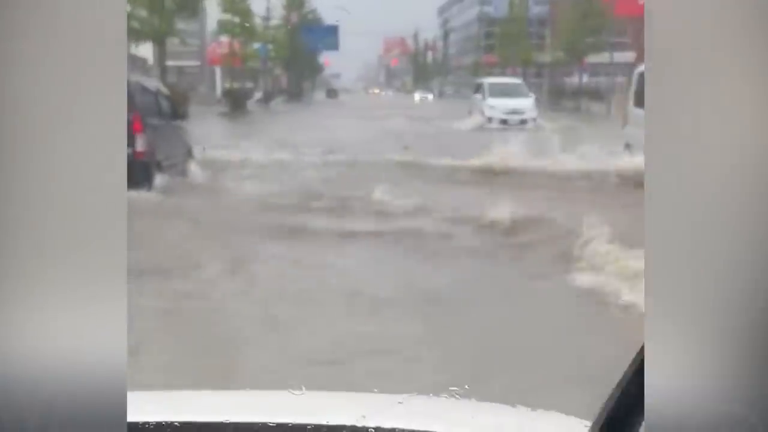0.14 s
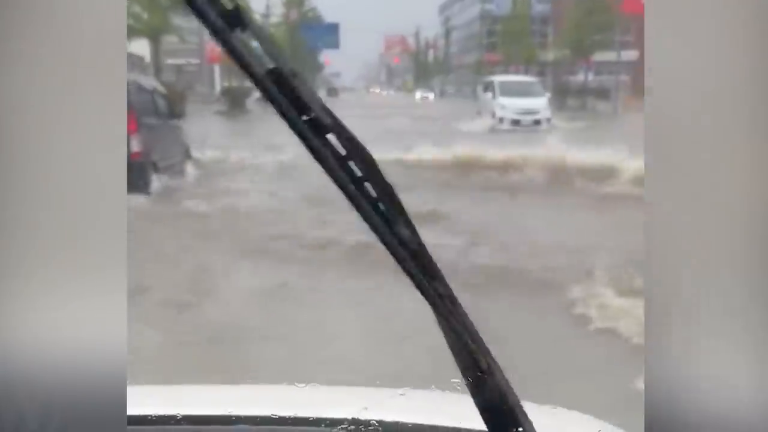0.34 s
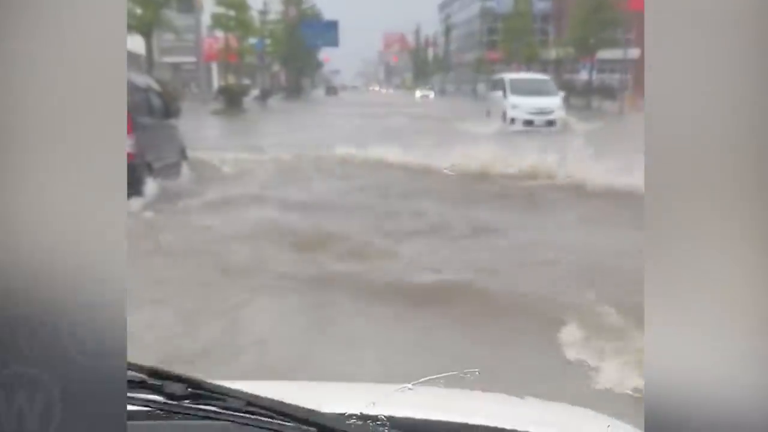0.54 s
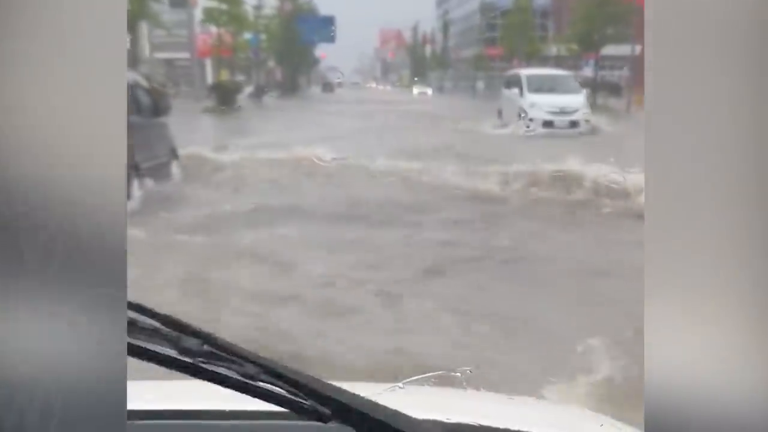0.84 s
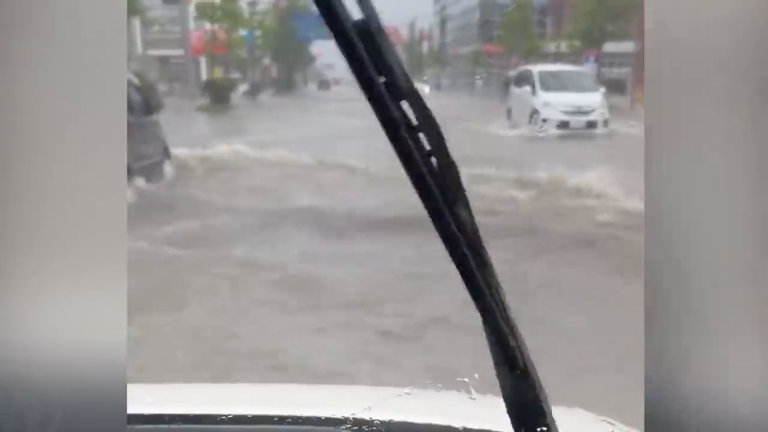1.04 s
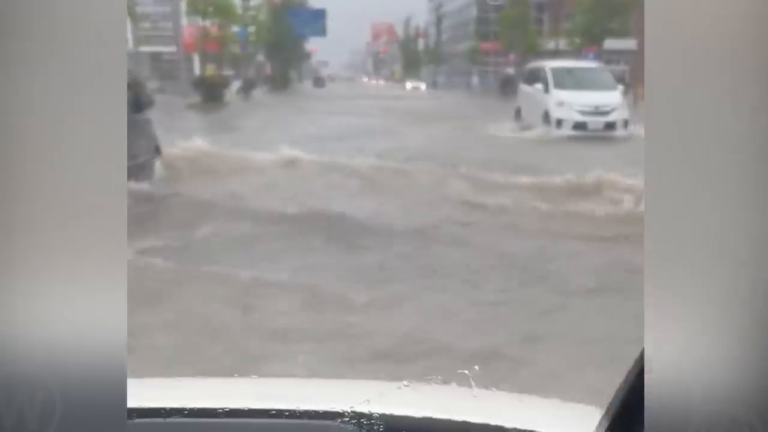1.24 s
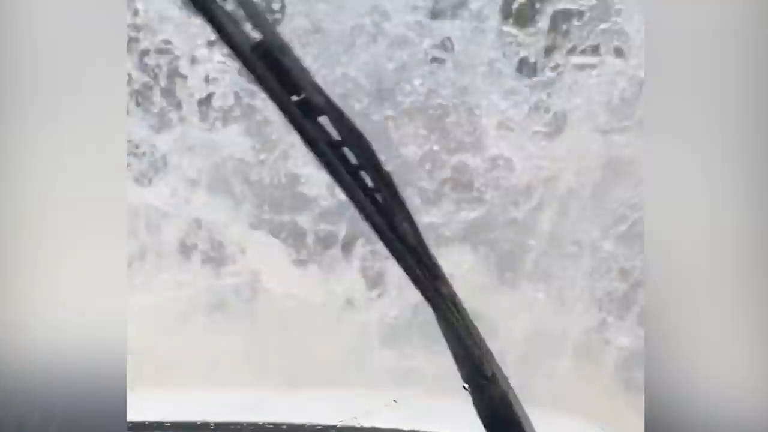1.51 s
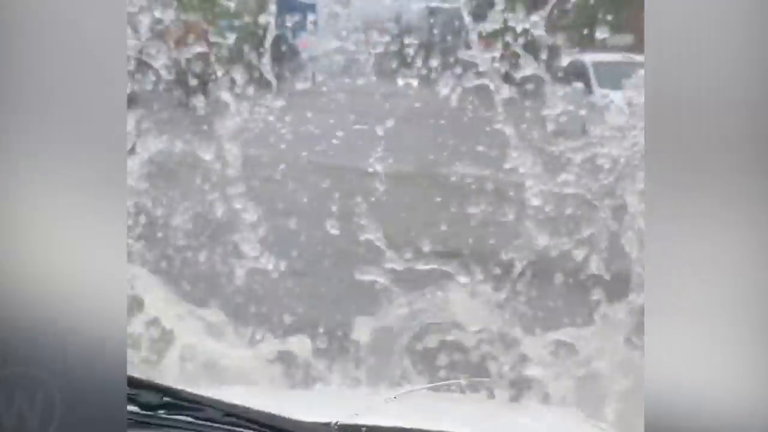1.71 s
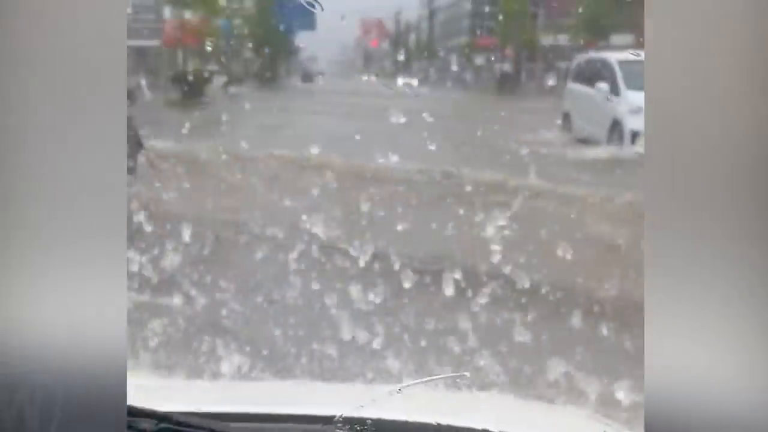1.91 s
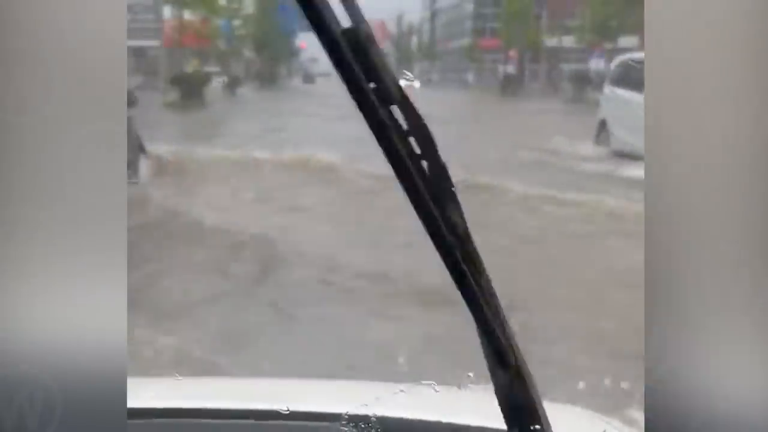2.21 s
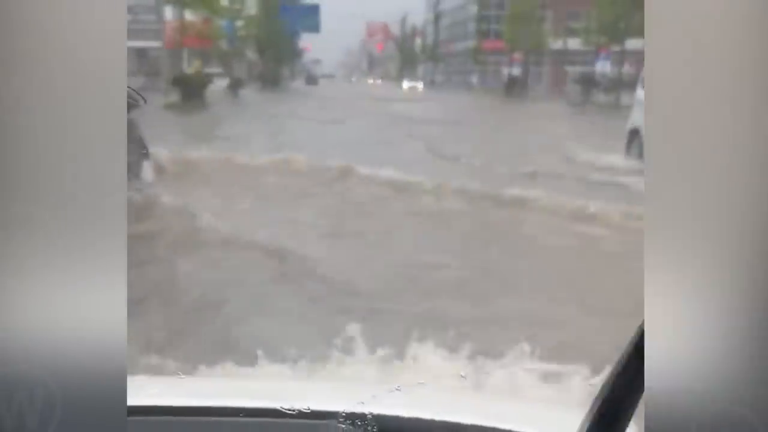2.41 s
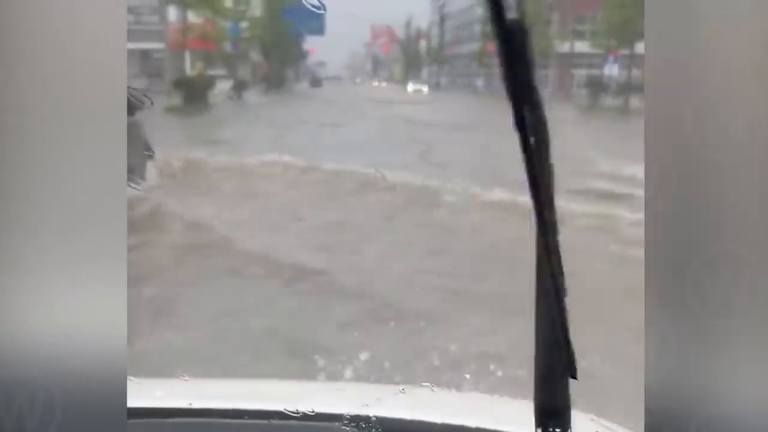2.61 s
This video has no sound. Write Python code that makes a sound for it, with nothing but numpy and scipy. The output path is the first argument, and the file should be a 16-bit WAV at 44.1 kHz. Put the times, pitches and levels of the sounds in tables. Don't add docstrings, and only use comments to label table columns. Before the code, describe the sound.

A deep, labouring engine boom fills the car cabin from the start, strong until about 0.6 s, dipping, then surging again around 1.1-1.7 s before sinking lower and weaker. Water churns and thumps irregularly under the floor throughout, with a soft wash along the doors. A faint wiper squeak ends by 0.2 s. A wave slaps the windscreen near 1.4-1.6 s over faint rain hiss and ticking drops.

```python
import sys
import numpy as np
from scipy import signal
from scipy.fft import rfft, irfft, next_fast_len
from scipy.io import wavfile

SR = 44100
rng = np.random.default_rng(int(sys.argv[2]) if len(sys.argv) > 2 else 0)


def undo_db(level):
    steps = np.asarray(level, float) / 20
    return 10 ** steps


def store_pcm(level_fs):
    pcm = np.round(np.clip(level_fs, -1, 1) * 32767).astype(np.int16)
    wavfile.write(sys.argv[1], SR, np.atleast_2d(pcm).T)


N = 121275
RUN_IN = 8192

# (frequency [Hz], level [dB per Hz])
HISS = [(1500, -3), (2200, -4), (2800, -1.5), (3500, -4), (4600, -4.5), (6500, -9.5), (10000, -20),
        (15000, -23.5)]


def rms_one(x):
    return x / np.sqrt(np.mean(x ** 2) + 1e-20)


def in_time(rows):
    s, *columns = np.transpose(rows)
    return [np.interp(np.arange(N) / SR, s, c) for c in columns]


def at_hz(points, hz):
    table_hz, values = np.transpose(points)
    return np.interp(np.log(hz), np.log(table_hz), values)


def drift(rate):
    r = np.exp(-2 * np.pi * rate * 40 / SR)
    noise = rng.standard_normal(N // 40 + 2002)
    slow = signal.lfilter([1], [1, -2 * r, r * r], noise)[2000:]
    return np.interp(np.arange(N) / 40, np.arange(len(slow)), rms_one(slow - slow.mean()))


def bands(spectrum, patchy_db, rate, swing_db=0, brighten=0):
    low_hz, high_hz = spectrum[0][0], spectrum[-1][0]
    borders = np.geomspace(low_hz, high_hz, int(3 * np.log2(high_hz / low_hz)) + 1)
    white = rng.standard_normal((2, 2, N + RUN_IN))
    together = drift(16.0)
    out = 0
    for k, (low, high) in enumerate(zip(borders, borders[1:])):
        sos = signal.butter(2, [low, high], "band", fs=SR, output="sos")
        band = signal.sosfilt(sos, white[k % 2])[:, RUN_IN:]
        hz = np.sqrt(low * high)
        extra_db = brighten * swing_db * np.log2(hz / low_hz)
        flicker_db = patchy_db * (0.26 * together + drift(rate))
        out = out + band * undo_db(at_hz(spectrum, hz) + extra_db + flicker_db)
    return out / np.sqrt(np.mean(out ** 2))


def ring(clicks, hz, t60):
    r, w = undo_db(-60 / (t60 * SR)), 2 * np.pi * hz / SR
    return signal.lfilter([0, np.sin(w)], [1, -2 * r * np.cos(w), r * r], clicks + 1e-18)


def engine():
    # (time [s], firing rate [Hz], level [dB], extra drone of third order [dB])
    engine_run = [(0, 60.33, -31, 0.5), (.13, 59.73, -19.5, 5), (.31, 59.55, -23.5, 0.5),
                  (.45, 58.86, -20.5, -4.5), (.6, 59.38, -24.5, -5), (.65, 58.8, -37.5, 10),
                  (1.03, 56.86, -49, -7), (1.12, 56.2, -21, -2), (1.2, 56.15, -20, -0.5),
                  (1.27, 56.22, -18, 3.5), (1.36, 56.46, -21.5, -4.5), (1.48, 57.15, -27, 3.5),
                  (1.55, 56.88, -22.5, 3.5), (1.61, 56.76, -28.5, 6.5), (1.69, 56.85, -20, -9.5),
                  (1.73, 56.46, -34, 6), (2.2, 53.02, -37.5, -3), (2.75, 53, -37.5, 6)]
    # (multiple of firing rate [-], level [dB], share of the load swing followed [-])
    firing_orders = [(1, 1.5, 0.98), (1.5, -23.5, 0.27), (2, -12, 0.25), (3, -16.5, 0.3), (4, -22, 0.35),
                     (5, -32.5, 1.7), (6, -30.5, 1.2)]
    start_turns, wander_hz = 0.19, 0.401
    surge_db, order_wobble_db = 2.0, 0.5
    hz, level_db, drone_db = in_time(engine_run)
    turns = start_turns + np.cumsum(hz + wander_hz * drift(2.71)) / SR
    top_db = level_db.max()
    out = 0
    for k, db, share in firing_orders:
        order_db = top_db + db + share * (level_db - top_db)
        if k == 3:
            order_db = order_db + drone_db
        wobble_db = (order_wobble_db if k > 1 else surge_db) * drift(9.9)
        out = out + np.sqrt(2) * undo_db(order_db + wobble_db) * np.sin(2 * np.pi * k * turns)
    return out


def knocks():
    # (time [s], level [dB], pitch [Hz])
    slugs = [(0.029, -18, 96), (0.085, -22, 164), (0.184, -26, 185), (0.211, -26, 238.5),
             (0.233, -19.5, 180.5), (0.266, -22, 166), (0.289, -24, 98.7), (0.409, -17.5, 103.3),
             (0.46, -24, 182), (0.618, -16.5, 111.6), (0.632, -20, 182.4), (0.661, -21.5, 101.5),
             (0.675, -22, 62), (0.728, -21, 99.5), (0.746, -14.5, 56.2), (0.759, -14, 94.6),
             (0.81, -22.5, 167), (0.814, -15.5, 63.3), (0.868, -13.5, 57), (0.91, -17, 98.3),
             (0.988, -21, 105.6), (1.034, -14, 63), (1.059, -25, 171), (1.078, -18.5, 95),
             (1.111, -22.5, 95), (1.211, -21, 89.8), (1.25, -20.5, 175), (1.303, -17, 94.2),
             (1.332, -17.8, 90.7), (1.441, -23.5, 265), (1.466, -24, 191), (1.51, -19.5, 93.5),
             (1.548, -23.5, 182), (1.658, -18.2, 167.3), (1.7, -26.5, 234), (1.744, -19.5, 108),
             (1.764, -24, 59), (1.848, -21.5, 61.6), (1.923, -16, 96), (1.977, -13.5, 65.3),
             (1.99, -30, 340), (2.097, -22.5, 91), (2.101, -18, 58.0), (2.178, -19, 57.55),
             (2.241, -20, 55), (2.269, -19, 101), (2.302, -18, 88.5), (2.339, -19, 57.3),
             (2.384, -14, 66.4), (2.454, -15.5, 51), (2.555, -16, 63.4), (2.593, -17, 106),
             (2.61, -22.5, 176), (2.622, -12, 57.2), (2.653, -14.5, 98), (2.687, -22.5, 57),
             (2.693, -20, 103.4)]
    rise_cycles, knock_db = 0.92, -1
    out = 0
    for s, db, hz in slugs:
        cycles = np.maximum(np.arange(N) / SR - s, 0) * hz
        swell = cycles / rise_cycles * np.exp(1 - cycles / rise_cycles)
        out = out + undo_db(db + knock_db) * swell * np.sin(2 * np.pi * cycles)
    return out


def churn(churn_db):
    # (frequency [Hz], level [dB per Hz])
    pan_colour = [(30, -24.5), (42, -7.5), (56, -9.5), (80, -5), (120, -7.5), (170, -11), (240, -15.5),
                  (330, -26)]
    return undo_db(churn_db - 1) * bands(pan_colour, patchy_db=1.52, rate=43.0)


def wash(churn_db, swing_db):
    # (frequency [Hz], level [dB per Hz])
    door_colour = [(250, -2.5), (400, 1), (600, -4.5), (800, -7), (1100, -10.5), (1500, -13.5),
                   (2000, -20.5), (2800, -18.5)]
    follows_churn, follows_spray = 0.37, 0.26
    wash_db = -42 + follows_churn * (churn_db - churn_db.mean()) + follows_spray * swing_db
    return undo_db(wash_db) * bands(door_colour, patchy_db=1.14, rate=27.0)


def sheet():
    start_s, rise_s, hold_s, fall_s = 1.285, .035, .195, .03
    t = np.arange(N) / SR - start_s
    return np.clip(t / rise_s, 0, 1) * np.exp(-np.maximum(t - rise_s - hold_s, 0) / fall_s)


def wave():
    # (time [s], peak level [dB])
    slap_hits = [
        (1.386, -38),
        (1.494, -27),
        (1.541, -30),
    ]
    # (frequency [Hz], level [dB per Hz])
    wave_colour = [(230, 2.5), (330, 5), (500, -5.5), (720, 4), (950, -9), (1600, -13.5), (3000, -21.5),
                   (6000, -43)]
    wave_db, lag_s = -43, .09
    slap_db, slap_rise_s, slap_t60_s = -10, 0.012, 0.13
    t = np.arange(N) / SR
    slaps = 0
    for s, db in slap_hits:
        fade_db = -60 * np.maximum(t - s, 0) / slap_t60_s
        slaps = slaps + undo_db(db + slap_db + fade_db) * np.clip((t - s) / slap_rise_s, 0, 1)
    thud = undo_db(wave_db) * np.roll(sheet(), int(lag_s * SR))
    return (thud + slaps) * bands(wave_colour, patchy_db=4.0, rate=32.0)


def drops(swing_db):
    drops_per_s, ring_cycles = 650, 6.3
    sizes = undo_db(4.9 * np.minimum(rng.exponential(1, N), 4)) * rng.choice([-1, 1], N)
    born = rng.random(N) < drops_per_s * undo_db(swing_db) / SR
    dealt = rng.integers(0, 16, N)
    out = 0
    for k, hz in enumerate(np.geomspace(1800, 13000, 16)):
        out = out + undo_db(at_hz(HISS, hz)) * ring(sizes * born * (dealt == k), hz, ring_cycles / hz)
    return rms_one(out)


def spray(usual_db, swing_db):
    hiss_db, drop_db, follows_swing = 15, -10, .4
    hiss = bands(HISS, patchy_db=1.0, rate=39.0, swing_db=swing_db, brighten=.36)
    ticks = undo_db(drop_db) * drops(swing_db) * [[1], [0]]
    return undo_db(usual_db + follows_swing * swing_db + hiss_db) * (hiss + ticks)


def squeak():
    start_hz, rise_hz_per_s, waver_hz = 3670, 250, 22
    end_s, fade_s, squeak_db = .21, .02, -63.5
    t = np.arange(N) / SR
    turns = np.cumsum(start_hz + rise_hz_per_s * t + waver_hz * drift(30.0)) / SR
    fade = np.clip((end_s - t) / fade_s + 1, 0, 1)
    return np.sqrt(2) * undo_db(squeak_db + 2.8 * drift(27.0)) * fade * np.sin(2 * np.pi * turns)


def ports(pair):
    # (frequency [Hz], likeness [0-1])
    port_likeness = [(120, .9995), (200, .992), (330, .92), (800, .72), (1800, .82), (2600, .7), (4400, .3),
                     (5500, .93), (5750, .997), (6300, .997), (7500, .88), (9000, .96), (9700, .997)]
    # (frequency [Hz], phase [radians])
    left_lead = [(0, 0), (120, -.01), (450, -.55), (1300, -.35), (1800, .2), (2500, 2.1), (3200, 2.0),
                 (4000, .9), (4600, 1.7), (5200, 1.5), (5850, 3.07), (6150, 3.2), (8270, 6.28),
                 (10000, 9.2), (10650, 9.65), (12650, 12.57), (14900, 15.7)]
    # (frequency [Hz], level [dB])
    left_tilt = [(150, .05), (250, 0), (500, 1.1), (1200, .4), (2200, -.8), (4500, -1.4), (5700, -.2),
                 (9000, 0)]
    length = next_fast_len(N + 2 * RUN_IN)
    hz = np.maximum(np.arange(length // 2 + 1) * SR / length, 1)
    padded = np.pad(pair, ((0, 0), (RUN_IN, RUN_IN)), "reflect", reflect_type="odd")
    one, other = rfft(padded, length)
    alike = np.clip(at_hz(port_likeness, hz), 0, 1)
    same = np.sqrt((1 + alike) / 2) * one
    apart = np.sqrt((1 - alike) / 2) * other
    lead = np.exp(.5j * np.interp(hz, *np.transpose(left_lead)))
    lean = undo_db(at_hz(left_tilt, hz) / 2)
    left = (same + apart) * lead * lean
    right = (same - apart) / lead / lean
    return irfft([left, right], length)[:, RUN_IN:RUN_IN + N]


def scene():
    # (time [s], level [dB])
    churn_course = [(0.0, -25), (0.3, -25.5), (0.6, -23.5), (0.7, -27.5), (0.8, -23), (1.0, -23.5),
                    (1.2, -25), (1.5, -25.5), (1.72, -25), (1.8, -28.5), (1.9, -27.5), (2.1, -28.5),
                    (2.2, -28.5), (2.3, -31.5), (2.52, -27), (2.62, -28), (2.75, -26)]
    # (time [s], level [dB])
    spray_course = [(0, -68.5), (.3, -70.5), (.6, -70.5), (.9, -69), (1.2, -70), (1.6, -72), (1.75, -69.5),
                    (1.87, -69.5), (2.0, -70.5), (2.14, -69.5), (2.24, -72), (2.75, -70)]
    churn_db, = in_time(churn_course)
    spray_db, = in_time(spray_course)
    usual_db = spray_db.mean()
    swing_db = spray_db - usual_db + 5 * sheet()
    tones = (engine() + knocks() + squeak()) * [[1], [0]]
    water = churn(churn_db) + wash(churn_db, swing_db) + wave() + spray(usual_db, swing_db)
    return ports(tones + water)


def low_pass(x):
    return signal.sosfilt(signal.butter(12, 15300, fs=SR, output="sos"), x)


def record(dry):
    edge_s, bass_hz, limit = .001, 300, .6
    dry = dry * np.clip(np.arange(N) / SR / edge_s + .5, 0, 1)
    hz = np.arange(N // 2 + 1) * SR / N
    bass = irfft(rfft(dry) / (1 + (hz / bass_hz) ** 4), N)
    rounded = limit * np.tanh(bass / limit)
    return low_pass(dry - bass + rounded)


dry = scene()
out = record(dry)
store_pcm(out)
```